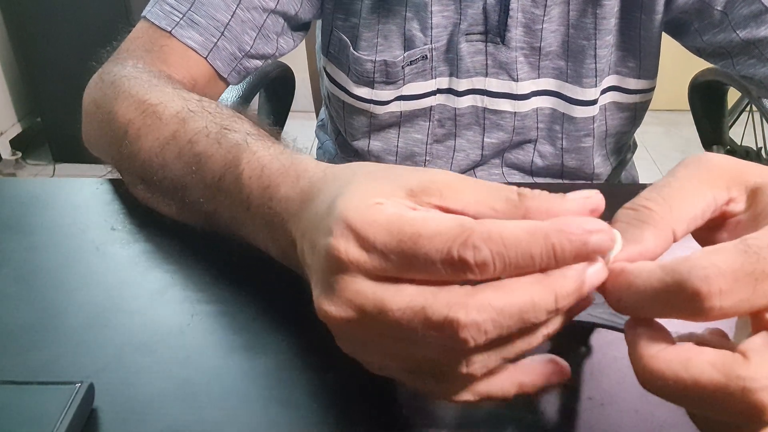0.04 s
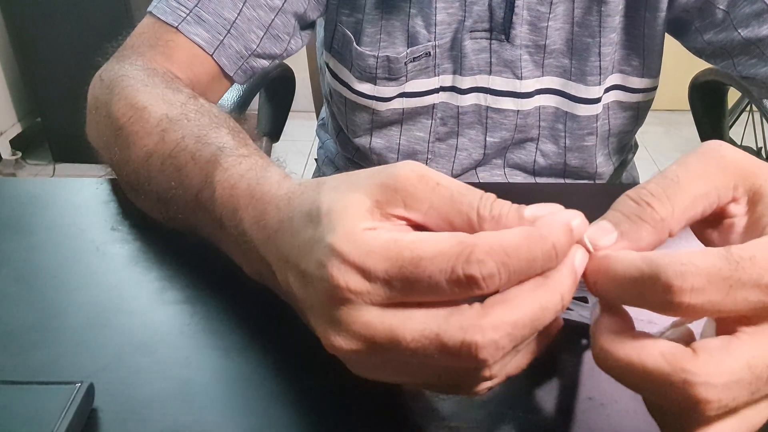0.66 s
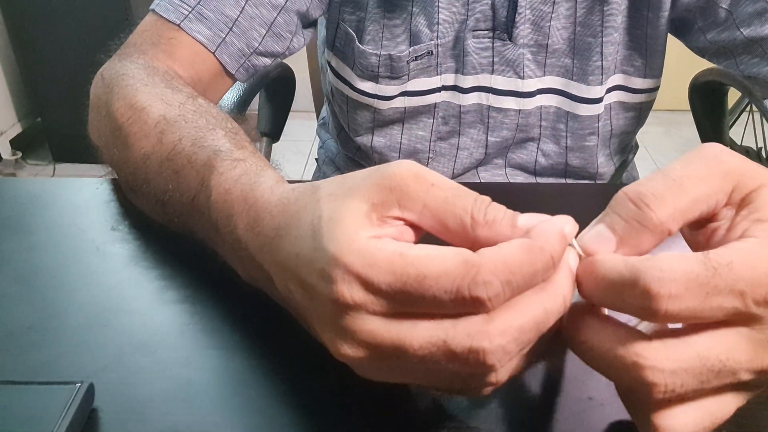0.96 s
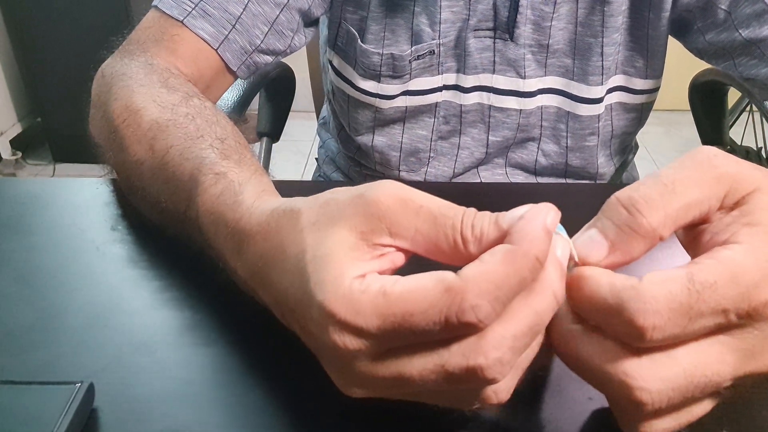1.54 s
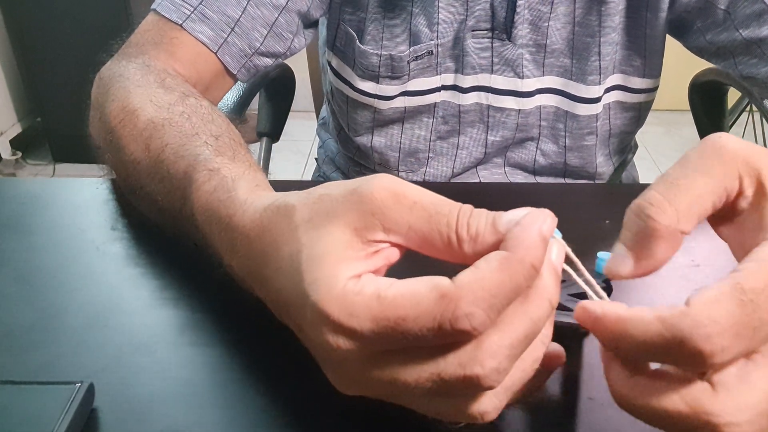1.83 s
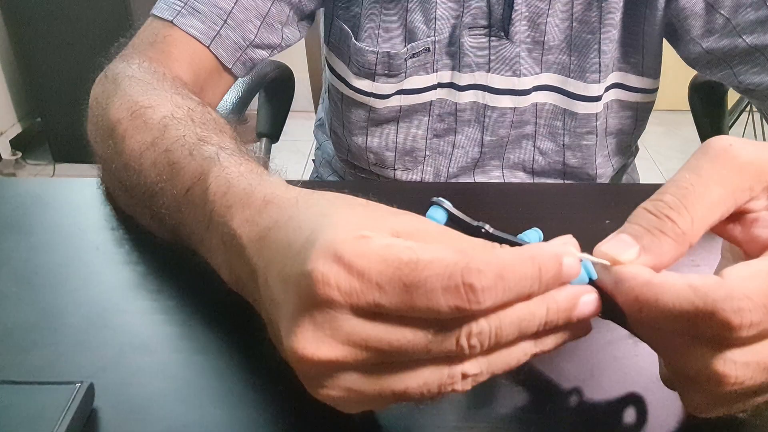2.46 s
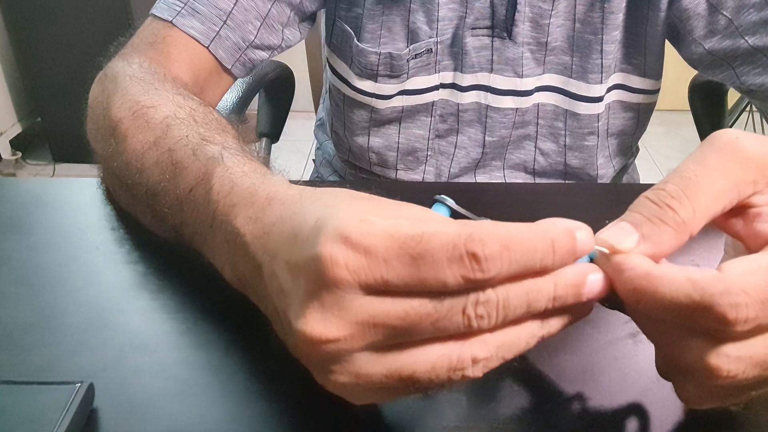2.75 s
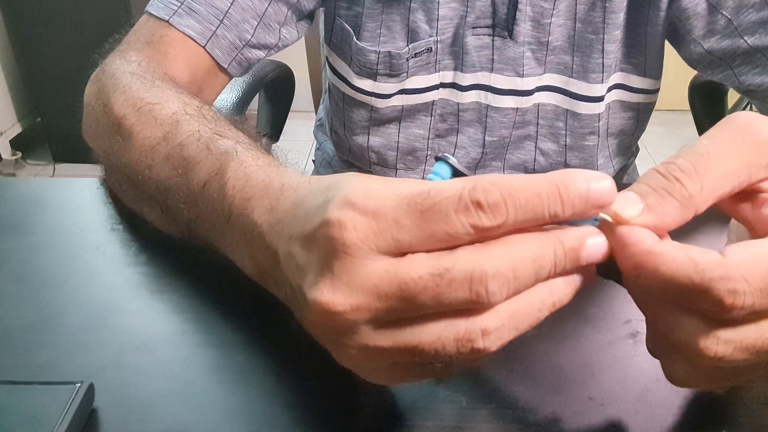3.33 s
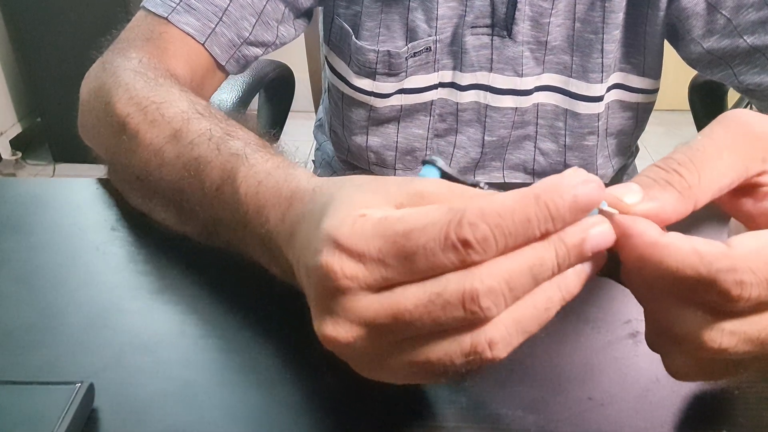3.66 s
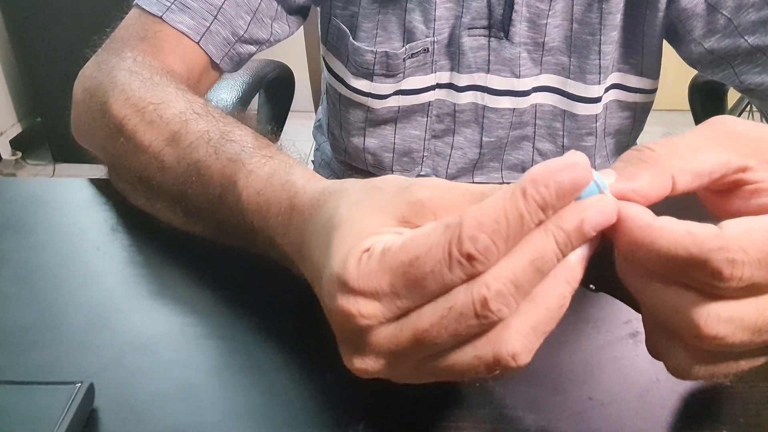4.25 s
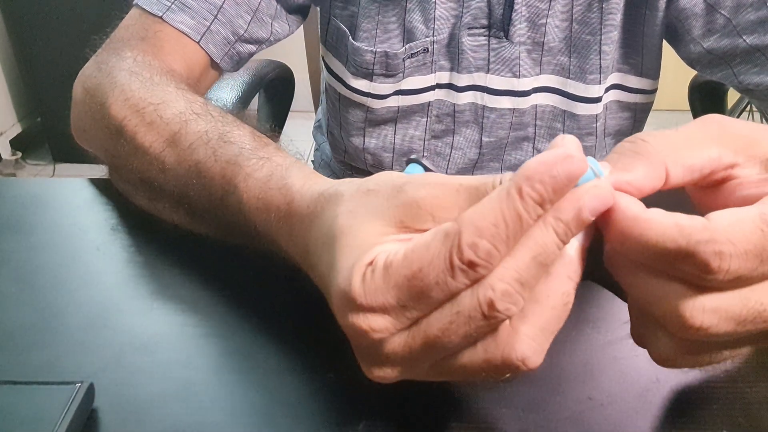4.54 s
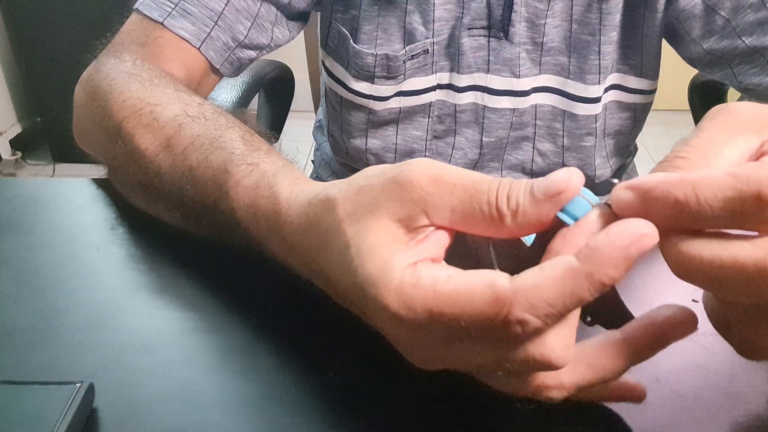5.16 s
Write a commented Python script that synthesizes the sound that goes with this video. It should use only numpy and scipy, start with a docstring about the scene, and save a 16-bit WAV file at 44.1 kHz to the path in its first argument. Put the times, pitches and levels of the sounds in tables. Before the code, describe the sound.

Faint handling of small plastic parts and twine over a low indoor hum, then one sharp, ringing knock on a desk.

```python
"""At a desk in a quiet room, two hands thread twine through small plastic parts.
The twine hisses and ticks as it slips through the fingers; rubbing plastic rasps and fittings clink.
Near the end the piece knocks sharply on the desk, so both ring; it bounces and slides to rest.
Behind it all are a low hum, faint machine tones, the rumble of the building and a thin hiss."""
import sys
import numpy as np
from scipy import signal
from scipy.fft import rfft, irfft
from scipy.io import wavfile

SR = 44100
rng = np.random.default_rng(int(sys.argv[2]) if len(sys.argv) > 2 else 0)


def inscribe(sig):
    """Save sig as 16-bit PCM at rate SR to the path in sys.argv[1].

    A 1-D sig is mono; a 2-D sig holds one channel per row.
    Samples are clipped to [-1, 1] before scaling.
    """
    pcm = np.round(np.clip(np.atleast_2d(sig).T, -1, 1) * 32767)
    wavfile.write(sys.argv[1], SR, pcm.astype(np.int16))


N = 237898
TIME = np.arange(N) / SR
FREQUENCIES = np.fft.rfftfreq(N, 1 / SR)


def knocks(ring_db=-7, rebound_s=.00043, rebound_share=.85):
    """The piece hits the desk with a click, and both ring on. The light bounces sound duller."""
    # each hit on the desk: start_s, level_db, treble_cutoff_hz
    hits = [(4.9475, -2.3, 15000), (5.0756, -18.8, 750), (5.1300, -43, 900)]
    # tone of the click: frequency_hz, level_db
    click_tone = [(40, -34), (180, -17), (400, -20), (560, -1.5), (820, -5), (1200, -.5), (1700, 1.5),
                  (2330, 9), (3000, -2), (4100, -8), (5000, -21), (6000, -20), (7500, -37), (10000, -34),
                  (15000, -42)]
    # notes that piece and desk ring with: pitch_hz, level_db, fade_s
    ringing_notes = [(463, -13, .15), (548, -2, .16), (585, -2, .12), (652, -3, .16), (762, -3, .19),
                     (831, -4, .18), (960, -9, .18), (1185, -6, .12), (1215, -3, .09), (1362, -8, .14),
                     (1458, -4, .15), (1736, -5, .17), (2035, -7, .13), (2180, -6, .11), (2350, -5, .1),
                     (2480, -5, .1), (2920, -8, .12), (3246, -9, .08), (3531, -18, .12), (8450, -42, .12),
                     (9520, -29, .14), (10450, -42, .18)]
    # first echoes off desk, hands and chest: delay_s, left_gain, right_gain
    echoes = [(.00095, .1, -.75), (.00197, -.55, .35), (.00243, .75, .45), (.00274, -.1, .6),
              (.00376, -.45, -.2), (.0058, .25, -.35), (.0122, .08, .1), (.0158, -.12, .08)]
    push = pulse(lambda hz: look_up(click_tone, hz))
    push = push / abs(push).max()
    click = -push
    add(click, rebound_s, rebound_share * push)  # the surface springs back, which hollows the click
    knock = np.zeros((2, SR))
    add(knock, 0, np.outer([1, .75], click))  # the direct sound, louder on the left
    for delay_s, left_gain, right_gain in echoes:
        add(knock, delay_s, np.outer([left_gain, right_gain], click))
    ringing = stereo(ring(ringing_notes), lag_s=.00051)
    add(knock, 0, gain_of(ring_db) * np.linalg.norm(click) * ringing)
    out = np.zeros((2, N))
    for start_s, level_db, cutoff_hz in hits:
        soften = signal.butter(1, cutoff_hz, fs=SR)
        add(out, start_s, gain_of(level_db) * signal.lfilter(*soften, knock))
    return out


def scrapes(slow_db=-5.5, slow_db_per_octave=-21.5):
    """The piece drags over the desk, sounding softer and duller as it slows."""
    # each drag: start_s, length_s, level_db, tilt_db_per_octave
    drags = [(0.029, 0.12, -77.5, -5.5), (5.05, 0.1, -43, -0.5), (5.159, 0.13, -49, -4.5)]
    # tone of the piece rubbing the desk: frequency_hz, level_db
    drag_tone = [(200, -19.5), (400, -22), (630, -1), (800, -3.5), (980, -3.5), (1230, 1), (1750, -7.5),
                 (2050, -16), (2450, -17.5), (2900, -19), (3600, -35.5), (4800, -28.5), (7500, -41.5),
                 (15000, -55)]
    out = np.zeros(N)
    for start_s, length_s, level_db, tilt in drags:
        fast = friction(length_s, level_db, tiny_slip(drag_tone, tilt))
        slow = friction(length_s, level_db + slow_db, tiny_slip(drag_tone, tilt + slow_db_per_octave))
        slowed = np.minimum(TIME[:len(fast)] / length_s, 1)
        add(out, start_s, (1 - slowed) * fast + slowed * slow)
    return stereo(out, lag_s=.00037) * panned(.75)


def hisses_and_ticks():
    """Bright hisses and ticks: first twine slips in the fingers, later the piece bounces and slides."""
    # each hiss or tick: start_s, length_s, level_db, tilt_db_per_octave
    # Rows before 5 s are twine. The last three are a short, bright tick just before the bounce,
    # the bright tick of the bounce, and the thin hiss of the piece sliding on the desk.
    bursts = [(1.742, 0.11, -93.5, 19), (3.162, .008, -92, 8), (3.49, 0.046, -99, 2),
              (3.748, 0.032, -99, 1), (3.828, 0.0094, -83, -2), (4.418, 0.0026, -54, -3.5),
              (4.678, 0.069, -83.5, 4), (4.716, .012, -75, 6), (5.0535, 0.0049, -63, 12),
              (5.073, 0.0048, -72, 12), (5.19, .19, -90, 18.5)]
    # tone they all share: frequency_hz, level_db
    bright_tone = [(500, -27), (2000, -29), (2700, -12), (3500, -25), (4450, -5), (5200, 5), (5900, -6),
                   (7300, -12), (8500, -21), (9800, -16.5), (11000, -24), (15000, -34)]
    out = np.zeros(N)
    for start_s, length_s, level_db, tilt in bursts:
        tick = tiny_slip(bright_tone, tilt, above_hz=2000, pivot_hz=5000)
        add(out, start_s, friction(length_s, level_db, tick))
    return out * panned(-1.5)


def clinks():
    """Small parts rub together: the hollow plastic rasps and the fittings ring briefly."""
    # each touch: start_s, length_s, fitting_db, plastic_db, plastic_tilt_db_per_octave
    touches = [(2.177, .011, -73.5, -75, 1), (2.415, .028, -76, -75, 6), (2.49, .05, -98, -73, -4),
               (2.527, .04, -94, -59.5, 0), (2.581, .06, -101, -83, 5)]
    # notes that a fitting rings with: pitch_hz, level_db, fade_s
    fitting_notes = [(2090, -10, .04), (2900, 0, .05), (3700, -9, .03), (4300, -6, .012), (6600, -11, .07),
                     (8400, 1, .055), (9350, -3, .06)]
    # tone of plastic rubbing on plastic: frequency_hz, level_db
    plastic_tone = [(300, -14), (590, -1), (780, -11), (1020, -16), (1200, 1), (1400, -2), (1820, -12),
                    (2100, -4), (2450, -24), (2900, -16), (3400, -27), (4000, -23), (4650, -15),
                    (5600, -30), (10000, -39), (15000, -46)]
    out = np.zeros(N)
    for start_s, length_s, fitting_db, plastic_db, tilt in touches:
        add(out, start_s, friction(length_s, fitting_db, ring(fitting_notes)))
        add(out, start_s, friction(length_s, plastic_db, tiny_slip(plastic_tone, tilt)))
    return stereo(out, lag_s=.0002) * panned(1.0)


def room(sound, build_up_s=.0054):
    """Echoes in a small room blur into one short tail, in which the bass lasts longest."""
    # tone of the echoes: frequency_hz, level_db
    echo_tone = [(250, -2), (550, 0), (820, 2), (1300, 0), (1950, 0), (2320, 3), (2800, -2), (3600, -8),
                 (4650, -2), (5600, -5), (7000, -2), (9000, 0), (15000, -3)]
    # time the echoes take to fall by 60 dB: frequency_hz, fade_s
    fade_times = [(100, .33), (500, 0.23), (1200, 0.16), (2500, 0.18), (4000, .18), (7000, 0.13),
                  (15000, 0.15)]
    hz, seconds, bands = signal.stft(noise_pair()[:, :SR // 2], SR, nperseg=256)
    level_db = look_up(echo_tone, hz)[:, None] - 60 * seconds / look_up(fade_times, hz)[:, None]
    tail = signal.istft(bands * gain_of(level_db), SR)[1]
    tail *= 1 - np.exp(-(TIME[:tail.shape[1]] / build_up_s) ** 2)
    tail /= np.linalg.norm(tail, axis=1, keepdims=True)
    return signal.fftconvolve(sound, tail, axes=1)[:, :N]


def hum(loud_pitch_hz=65.3, loud_db=-42, sag_hz_per_db=.14, flutter_depth=.2, flutter_hz=10):
    """A low tone swells, fades and flutters; its pitch sags as it grows louder."""
    # how the hum swells and fades: time_s, level_db
    swells = [(0.0, -47.5), (0.46, -44.5), (0.6, -47), (1.5, -41), (2.0, -53), (2.12, -50), (2.18, -57),
              (2.46, -42), (2.61, -56), (2.78, -51.5), (3.26, -68.5), (3.3, -48.5), (4.01, -60),
              (4.04, -50.5), (4.34, -59.5), (4.49, -46.5), (4.61, -64), (5.39, -54)]
    level_db = np.interp(TIME, *np.transpose(swells))
    pitch_hz = loud_pitch_hz - sag_hz_per_db * (level_db - loud_db)
    # the real part shakes the loudness, the imaginary part shakes the pitch
    flutter = 1 + flutter_depth * (wander(flutter_hz) + 1j * wander(flutter_hz))
    tone = np.exp(2j * np.pi * np.cumsum(pitch_hz) / SR) * flutter
    return stereo(gain_of(level_db - .18) * unit_level(tone.real), lag_s=.00045) * panned(-1.4)


def machine_tones(flicker_db=2, flicker_hz=4):
    """Faint machine tones swell in, waver in pitch and loudness, and fade out."""
    # each tone: start_s, length_s, pitch_hz, wander_hz (both how far and how fast), level_db
    tones = [(0, 1.15, 124, 3, -63), (1.9, .72, 124, 2, -56.5), (1.05, 1.65, 157, 2, -65),
             (0, 3.2, 199, 1, -73), (0, 2.3, 875, 16, -96), (0, 2.3, 1350, 40, -94),
             (0, 2.5, 3370, 24, -104.5), (2.7, 1.8, 440, 10, -82)]
    out = np.zeros(N)
    for start_s, length_s, pitch_hz, wander_hz, level_db in tones:
        swell = signal.windows.tukey(int(length_s * SR), .3)
        wavering_hz = pitch_hz + wander_hz * wander(wander_hz)
        flicker = gain_of(flicker_db * wander(flicker_hz))
        tone = flicker * np.sin(2 * np.pi * np.cumsum(wavering_hz) / SR)
        add(out, start_s, gain_of(level_db) * swell * unit_level(tone[:len(swell)]))
    return stereo(out, lag_s=.0003) * panned(-.3)


def rumble_and_hiss(rumble_db=-55, fade_db_per_s=-.5, swell_db=1, swell_hz=3, hiss_db=-71):
    """The building rumbles, slowly easing, under a thin steady hiss."""
    # tone of the building's rumble: frequency_hz, level_db
    rumble_tone = [(20, -32.5), (38, -16.5), (54, 5), (68, -2), (84, 3), (98, -2), (125, 0), (165, -4.5),
                   (220, -12.5), (275, -22.5), (500, -52), (1500, -93)]
    # tone of still air and microphone hiss: frequency_hz, level_db
    hiss_tone = [(20, -26), (180, -7.5), (300, -5.5), (450, 2.5), (560, -5), (700, -11.5), (1000, -19.5),
                 (1500, -20), (2400, -28), (3200, -29.5), (4500, -34), (6800, -34), (8000, -40),
                 (15000, -39)]
    level_db = rumble_db + fade_db_per_s * TIME + swell_db * wander(swell_hz)
    rumble = gain_of(level_db) * steady_noise(rumble_tone) * panned(.0041)
    hiss = gain_of(hiss_db) * steady_noise(hiss_tone) * panned(-.68)
    return rumble + hiss


def friction(length_s, level_db, slip_sound, uneven_db=3):
    """Rubbing is a quick run of tiny uneven slips, each making the same small sound."""
    count = max(int(length_s * SR), 8)
    slips, grip = rng.standard_normal((2, SR // 2))
    slips = slips[:count] * gain_of(uneven_db * np.repeat(grip, 64)[:count])  # new grip every 64 samples
    rub = signal.fftconvolve(slips * signal.windows.tukey(count, .5), slip_sound)
    return gain_of(level_db) * np.sqrt(count) * rub / np.linalg.norm(rub)


def tiny_slip(tone, tilt_db_per_octave, above_hz=600, pivot_hz=1000):
    """The tick of one slip. A tilt above zero makes it brighter, below zero duller."""
    def tilted_db(hz):
        octaves = np.log2(np.maximum(hz, above_hz) / pivot_hz)
        return look_up(tone, hz) + tilt_db_per_octave * octaves
    return pulse(tilted_db)


def pulse(level_db_at, size=2048):
    """The sharpest click that has the given level at each frequency."""
    hz = abs(np.fft.fftfreq(size, 1 / SR))
    log_gain = np.log(gain_of(level_db_at(hz)))
    spectrum = np.exp(np.conj(signal.hilbert(log_gain)))  # packs the energy at the start
    return np.fft.ifft(spectrum).real[:size // 2]


def ring(notes):
    """A struck object rings with pure notes, each falling by 60 dB in its fade_s."""
    seconds = TIME[:SR // 2]
    sound = sum(gain_of(level_db - 60 * seconds / fade_s) * np.sin(2 * np.pi * pitch_hz * seconds)
                for pitch_hz, level_db, fade_s in notes)
    return sound / np.linalg.norm(sound)


def steady_noise(tone):
    """Even stereo noise, shaped by a tone table."""
    return unit_level(irfft(rfft(noise_pair()) * gain_of(look_up(tone, FREQUENCIES)), N))


def noise_pair():
    """White noise as two close microphones hear it, alike in the bass."""
    # how alike left and right are: frequency_hz, likeness (1 the same, -1 opposite)
    likeness_table = [(60, 0.94), (130, 0.91), (290, 0.41), (640, -0.7), (1410, -0.4), (3100, -0.08),
                      (6820, -0.57), (15000, 0.03)]
    likeness = np.clip(look_up(likeness_table, FREQUENCIES), -1, 1)
    left, unrelated = rfft(rng.standard_normal((2, N)))
    right = likeness * left + np.sqrt(1 - likeness ** 2) * unrelated
    return irfft(np.array([left, right]), N)


def wander(rate_hz):
    """A smooth random drift, mostly slower than the given rate."""
    return unit_level(irfft(rfft(rng.standard_normal(N)) / (1 + (FREQUENCIES / rate_hz) ** 4), N))


def stereo(sound, lag_s):
    """The sound reaches the right side a moment after the left."""
    seconds = TIME[:len(sound)]
    return np.array([sound, np.interp(seconds - lag_s, seconds, sound, left=0)])


def panned(left_louder_db):
    """Left and right gains that place a sound to one side."""
    return gain_of([[left_louder_db / 2], [-left_louder_db / 2]])


def gain_of(db):
    """Turns decibels into a number to multiply by."""
    return 10 ** (np.asarray(db) / 20)


def unit_level(sound):
    """Scales a sound to an average (rms) level of 1."""
    return sound / np.sqrt(np.mean(sound ** 2) + 1e-30)


def look_up(table, hz):
    """Reads between the rows of a frequency table, with octaves evenly spaced."""
    row_hz, values = np.transpose(table)
    return np.interp(np.log(hz + 1), np.log(row_hz + 1), values)


def add(mix, start_s, sound):
    """Mixes a sound in at the given time."""
    part = mix[..., round(start_s * SR):][..., :sound.shape[-1]]
    part += sound[..., :part.shape[-1]]


def scene(knock_echo_db=-9, handling_echo_db=-11):
    """The knocks and handling echo in the room, over the hum and other background sounds."""
    hits = knocks()
    handling = scrapes() + clinks() + hisses_and_ticks()
    echoes = room(gain_of(knock_echo_db) * hits + gain_of(handling_echo_db) * handling)
    return hits + handling + echoes + hum() + machine_tones() + rumble_and_hiss()


def record(dry):
    """Cuts off the highest treble, above 15300 Hz."""
    treble_cut = signal.firwin(511, 15300, window=("kaiser", 9), fs=SR)
    return signal.oaconvolve(dry, treble_cut[None], "same")


dry = scene()
out = record(dry)
inscribe(out)
```